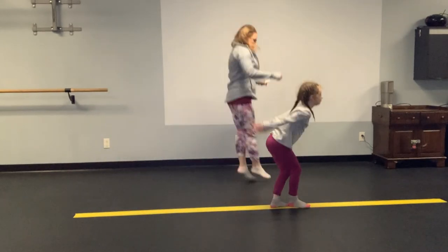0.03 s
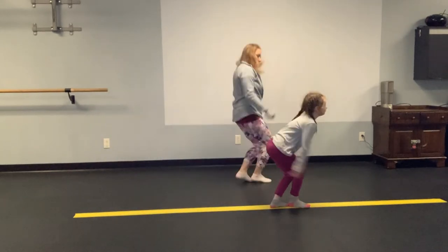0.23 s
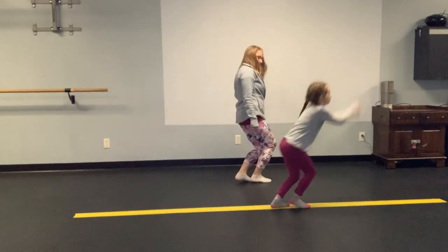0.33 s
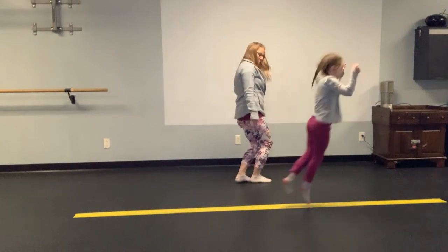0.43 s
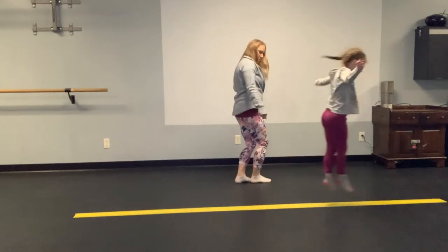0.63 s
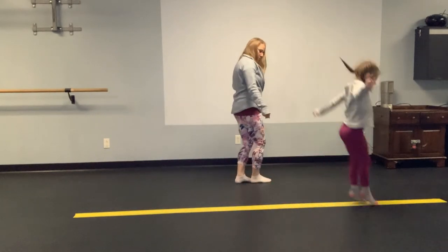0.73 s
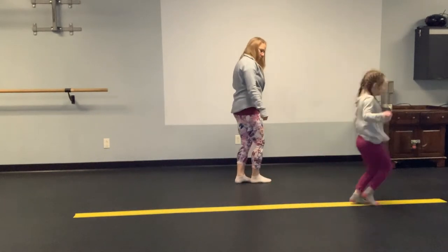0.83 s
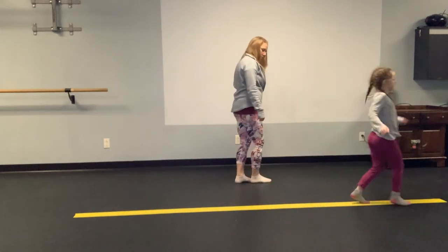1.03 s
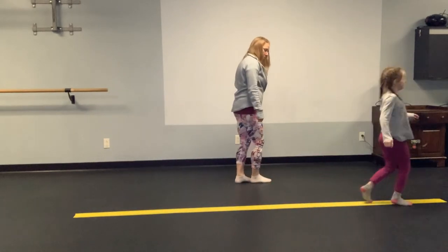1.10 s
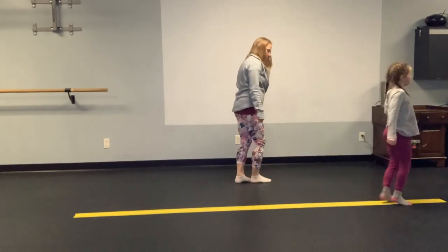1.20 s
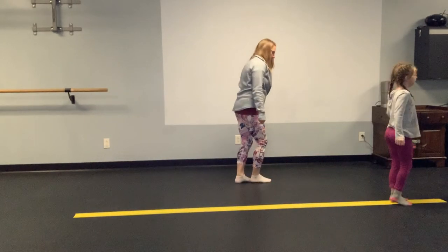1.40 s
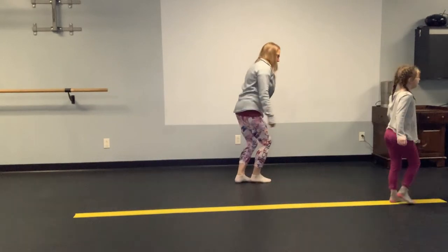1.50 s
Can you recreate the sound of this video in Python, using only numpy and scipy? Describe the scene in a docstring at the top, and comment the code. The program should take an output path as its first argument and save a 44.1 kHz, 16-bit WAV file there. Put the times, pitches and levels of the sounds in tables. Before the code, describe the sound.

Jump landings boom on a sprung floor a few metres away: first a heavy one, then a lighter one with a tiny click. Socks and clothes brush softly in a quiet, slightly echoing studio with low ventilation noise.

```python
"""Jumps on a sprung floor

An adult and then a child land in socks on a sprung studio floor, a few metres away. Each impact
drives a booming flexure of the floor and excites the low normal modes of floor and room. Soles pat,
boards ring, and friction makes socks and clothes rustle over a soft rumble of ventilation."""
import sys
import numpy as np
from scipy import signal
from scipy.fft import rfft, irfft
from scipy.io import wavfile
from scipy.ndimage import uniform_filter1d

SR = 44100
rng = np.random.default_rng(int(sys.argv[2]) if len(sys.argv) > 2 else 0)


def transcribe(u):
    """Save the signal u as a 16-bit wav file named by the first command-line argument.

    u: samples, shape (n,) or (channels, n), limited to [-1, 1]; the rate is SR.
    q: integer samples, one column per channel.
    """
    v = np.clip(np.atleast_2d(u).T, -1, 1)
    q = np.round(v * 32767).astype(np.int16)
    wavfile.write(sys.argv[1], SR, q)


N = 68355
TIME, FREQS = np.arange(N) / SR, np.fft.rfftfreq(N, 1 / SR)
RIGHT_LEAD_S = .0004


def amp(db):
    """Amplitude ratio of a level in decibels."""
    return 10 ** (np.asarray(db) / 20)


def curve(points, hz=FREQS):
    """Interpolation on a logarithmic frequency axis."""
    point_hz, value = np.transpose(points)
    return np.interp(np.log(hz + 1), np.log(point_hz + 1), value)


# Likeness of the two microphones: frequency_hz, correlation (before clipping)
CORRELATION = [(40, 1), (130, 0.85), (260, 0.76), (500, 0.23), (1000, -0.038), (2000, 0.017),
               (4000, -0.077), (6000, -0.0063), (8000, -0.71), (9500, -1.1), (11500, 0.63), (15000, 1)]
# Left channel relative to right: frequency_hz, level_db
LEFT_BALANCE = [(250, -1), (500, -0.27), (4000, -0.7), (10000, 1)]
def noise(spectrum_db):
    """Partial coherence: independent mid and side signals mix into coloured stereo noise of unit rms."""
    mid, side = rfft(rng.standard_normal((2, N)))
    correlation = np.clip(curve(CORRELATION), -.999, .999)
    mid *= np.sqrt((1 + correlation) / 2)
    side *= np.sqrt((1 - correlation) / 2)
    pair = np.array([(mid + side) * amp(curve(LEFT_BALANCE)), mid - side])
    x = irfft(pair * amp(spectrum_db), N)
    return x / x.std()


# Reverberation time: frequency_hz, t60_s
ROOM_DECAY = [(50, 0.9), (120, 0.73), (300, 0.34), (1000, 0.89), (4000, .42), (15000, 0.17)]
def in_room(x, wet_db, gap_s=.0011, build_s=.0057):
    """Reverberation: a diffuse field follows the direct sound and decays exponentially in each band."""
    hz, t, bands = signal.stft(noise(0 * FREQS), SR, nperseg=512)
    decay = amp(-60 * t / curve(ROOM_DECAY, hz)[:, None])
    tail = signal.istft(bands * decay, SR, nperseg=512)[1][:, :N]
    tail *= np.clip((TIME - gap_s) / build_s, 0, 1)
    tail /= np.linalg.norm(tail[0])
    return x + amp(wet_db) * signal.fftconvolve(x[:1], tail, axes=1)[:, :N]


# Spectrum of the airflow: frequency_hz, relative_db
AIR_SPECTRUM = [(20, -32), (35, -14), (58, -4), (78, -3), (100, -7), (135, -2), (175, -14), (260, -11),
                (460, -15), (650, -24), (1000, -29), (1600, -37), (2400, -41), (3100, -49), (5000, -52),
                (8000, -64), (10000, -65), (12500, -62), (15500, -64)]
def ventilation(level_db=-49.5):
    """Stationary noise: steady airflow gives a low rush."""
    return amp(level_db) * noise(curve(AIR_SPECTRUM))


def squeak(peak_s=.21, half_width_s=.017, level_db=-80, pitch_hz=11097, width_hz=310):
    """Narrow-band noise is heard as a pitch: a faint, thin whistle on the heavy landing."""
    swell = amp(level_db) * np.exp(-((TIME - peak_s) / half_width_s) ** 2)
    band_db = -40 * np.log10(1 + ((FREQS - pitch_hz) / width_hz) ** 2)
    return swell * noise(band_db)


# Snaps as the child's feet settle: start_s, level_db
SNAP_EVENTS = [(0.8919, -46.5), (.9028, -73)]
# Spectrum of a snap: frequency_hz, relative_db
SNAP_SPECTRUM = [(500, -30), (2200, -12), (3200, 1), (4500, 0), (6500, -4), (9000, -12), (12000, -11),
                 (16000, -14)]
def snaps(decay_s=.0013):
    """Broadband transients: noise that dies in about a millisecond is heard as a bright click."""
    envelope = sum(amp(db) * (TIME > start) * np.exp(-abs(TIME - start) / decay_s)
                   for start, db in SNAP_EVENTS)
    return envelope * noise(curve(SNAP_SPECTRUM))


# Socks sliding and clothes brushing: peak_s, level_db, rise_s, fall_s, tilt_db_per_octave
FABRIC_STROKES = [(.218, -65.5, 0.021, 0.03, -5), (.27, -77, 0.011, 0.021, 0.5),
                  (0.325, -75, 0.0074, 0.019, 0.5), (0.471, -73, 0.1, 0.053, -3.5),
                  (0.559, -78.5, 0.066, 0.049, 6), (.64, -70.5, 0.26, 0.48, -7),
                  (0.927, -68.5, 0.014, 0.02, -0.5), (1.007, -71.5, 0.025, 0.03, 1),
                  (1.104, -57.5, 0.023, 0.016, -1.5), (1.19, -74.5, 0.091, 0.12, -2.5),
                  (1.362, -68, 0.17, .09, -6)]
# Spectrum of rubbing fabric: frequency_hz, relative_db
FABRIC_SPECTRUM = [(200, -17), (900, 0), (1500, -4.5), (2250, -0.5), (2800, -4), (3600, 0.5), (6500, -9.5),
                   (9000, -10.5), (11500, -15.5), (14500, -15), (16000, -21)]
def scuffs(grain_db=1.0):
    """Stick-slip friction: fabric catches and slips in fine grains under a smooth stroke."""
    octaves_above_1khz = np.log2(np.maximum(FREQS, 1000) / 1000)
    out = np.zeros((2, N))
    for peak_s, db, rise_s, fall_s, tilt in FABRIC_STROKES:
        t = TIME - peak_s
        stroke = np.exp(-(t / np.where(t < 0, rise_s, fall_s)) ** 2)
        grain = uniform_filter1d(rng.standard_normal(N), size=90)
        rub = noise(curve(FABRIC_SPECTRUM) + tilt * octaves_above_1khz)
        out += stroke * amp(db + grain_db * grain / grain.std()) * rub
    return out


# Soles striking the mat: start_s, knock_db, knock_pitch_ratio, slap_db, hiss_db, decay_s
SOLE_CONTACTS = [(0.185, -44.5, 0.97, -52, -81, 0.015), (0.202, -32, 1.06, -60.5, -85.5, 0.02),
                 (0.252, -42, 0.71, -71.5, -87, 0.014), (0.508, -55, 0.98, -62, -82, 0.0044),
                 (0.8436, -42, .92, -53.5, -62.5, .009), (.851, -34.5, 0.875, -65, -66.5, 0.026),
                 (0.97, -72.5, .9, -64, -74.5, 0.024)]
# Spectra of the hollow knock, light slap and sock hiss: frequency_hz, relative_db
KNOCK_SPECTRUM = [(60, -31.5), (150, -3), (270, 2.5), (340, -3), (440, 0), (540, -18), (750, -21),
                  (1020, -20), (1400, -39.5), (4000, -62.5)]
SLAP_SPECTRUM = [(200, -7.5), (700, -2), (1300, 5), (2000, -3.5), (2550, 0.5), (2950, -11), (6000, -30.5),
                 (16000, -57)]
HISS_SPECTRUM = [(300, -32.5), (1500, -28), (3000, 0.5), (5000, 3), (7000, -4), (9000, -9), (11500, -9),
                 (14500, -8.5), (16000, -17.5)]
def pats(rise_s=.002):
    """Impact noise: each sole gives a slap, a hiss and a knock pitched by its spot on the floor."""
    slap, hiss = noise(curve(SLAP_SPECTRUM)), noise(curve(HISS_SPECTRUM))
    out = np.zeros((2, N))
    for start, knock_db, pitch_ratio, slap_db, hiss_db, decay_s in SOLE_CONTACTS:
        t = np.maximum(TIME - start, 0)
        envelope = np.minimum(t / rise_s, 1) * np.exp(-np.maximum(t - rise_s, 0) / decay_s)
        knock = noise(curve(KNOCK_SPECTRUM, FREQS / pitch_ratio))
        out += envelope * (amp(knock_db) * knock + amp(slap_db) * slap + amp(hiss_db) * hiss)
    return out


# Floorboard modes: pitch_hz, level_re_knock_db, t60_s
FLOORBOARD_MODES = [(277, -12.5, .4), (359.3, -8, .33), (416.4, -8.5, 0.18), (543, -14.5, 0.14),
                    (902, -22.5, 0.35)]
def boards(rise_s=.005):
    """Damped free vibration: the floorboards ring at their natural frequencies under each sole."""
    out = np.zeros((2, N))
    for start, knock_db, *_ in SOLE_CONTACTS:
        t = np.maximum(TIME - start, 0)
        for hz, db, t60 in FLOORBOARD_MODES:
            phase = rng.uniform(0, 2 * np.pi) + np.array([[0], [2 * np.pi * hz * RIGHT_LEAD_S]])
            envelope = amp(knock_db + db - 60 * t / t60) * np.minimum(t / rise_s, 1)
            out += envelope * np.sin(2 * np.pi * hz * t + phase)
    return out


# Landings, push-off and small steps: start_s, level_db, pitch_hz, rise_s, mode_drive_db
FLOOR_LOADS = [(0.19, -24, 167, 0.011, 9.5), (.191, -9.5, 101.6, 0.021, -3), (.192, -18, 60, 0.022, -1.5),
               (.188, -29.5, 48, .028, 4), (.352, -32.5, 54.5, 0.073, -1.5), (.315, -39, 112, 0.065, -3.5),
               (.8485, -16, 120, .011, -4.5), (.8546, -17.5, 75, .027, -7.5), (.848, -28, 50, .028, 3),
               (.95, -37.5, 132.8, 0.03, -2), (0.888, -36, 59.6, 0.043, 3), (1.06, -46, 58, 0.038, -6),
               (1.215, -46.5, 70.2, 0.047, 4.5), (1.7, -44, 58, .06, 0)]
# Low modes of floor and room: pitch_hz, relative_db, t60_s
LOW_MODES = [(54.7, -11.5, 1), (72.45, -9.5, 1), (94.34, -9.5, 0.59), (113.43, -12, 0.7), (149, -22.5, 0.7),
             (169, -6, 0.48), (277, 2.5, 0.66)]
def thumps(swell_power=5.06, glide=.58, glide_s=.0064, modes_db=-58.5, modes_delay_s=.03):
    """Modal excitation: the floor swings a few cycles under each load and sets the low modes ringing."""
    floor, drive = np.zeros((2, N))
    for start, db, hz, rise_s, drive_db in FLOOR_LOADS:
        t = np.maximum(TIME - start, 0)
        # Dispersion: the high bending waves arrive first, so the pitch falls.
        cycles = hz * (t + glide * glide_s * (1 - np.exp(-t / glide_s)))
        swell = (t / rise_s * np.exp(1 - t / rise_s)) ** swell_power
        swing = amp(db) * swell * np.sin(2 * np.pi * cycles)
        floor += swing
        drive += amp(drive_db) * swing
    t = np.maximum(TIME - modes_delay_s, 0)
    ring = sum(amp(modes_db + db - 60 * t / t60) * np.sin(2 * np.pi * hz * t)
               for hz, db, t60 in LOW_MODES)
    left = floor + signal.fftconvolve(drive, ring)[:N]
    right = np.interp(TIME + RIGHT_LEAD_S, TIME, left)
    return np.array([left, right])


def scene():
    """Superposition: feet, fabric and their reverberation add to the ventilation."""
    return (ventilation() + in_room(thumps(), wet_db=-14) + in_room(pats(), wet_db=-3.5) + boards()
            + in_room(scuffs(), wet_db=-1.5) + in_room(snaps(), wet_db=-3.5) + squeak())


def record(dry, low_cut_hz=28, high_cut_hz=15650):
    """Band limiting: the microphone loses the deepest bass, and a low-pass removes the top treble."""
    highpass = signal.butter(2, low_cut_hz, "highpass", fs=SR, output="sos")
    lowpass = signal.firwin(511, high_cut_hz, window=("kaiser", 9), fs=SR)
    return signal.oaconvolve(signal.sosfilt(highpass, dry), lowpass[None], "same")


dry = scene()
out = record(dry)
transcribe(out)
```